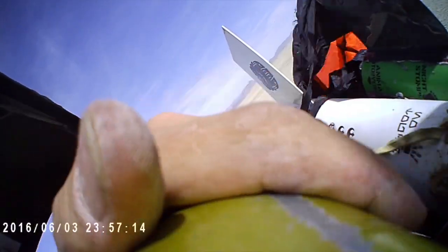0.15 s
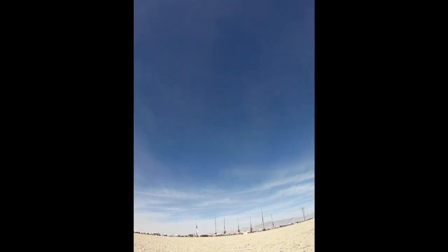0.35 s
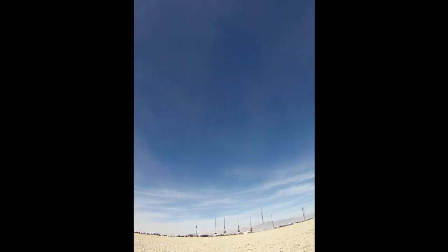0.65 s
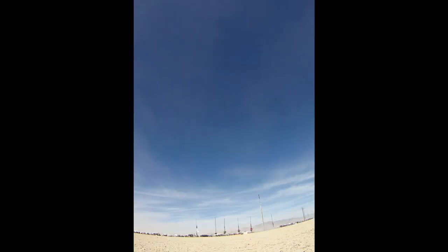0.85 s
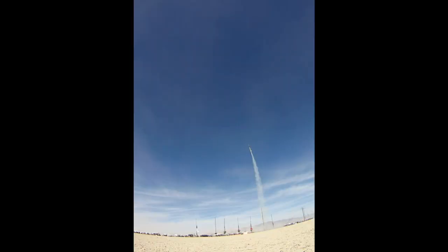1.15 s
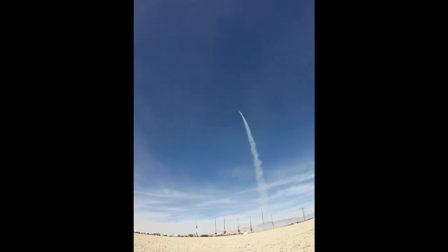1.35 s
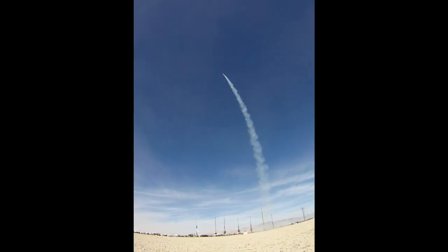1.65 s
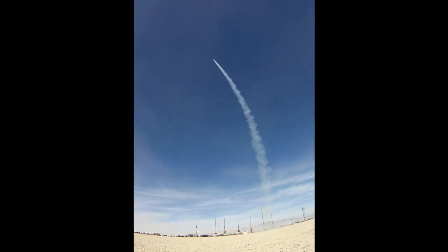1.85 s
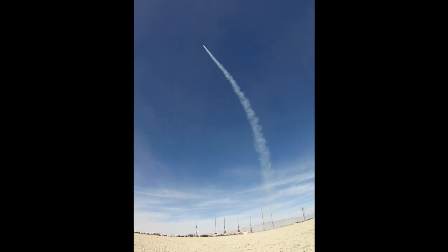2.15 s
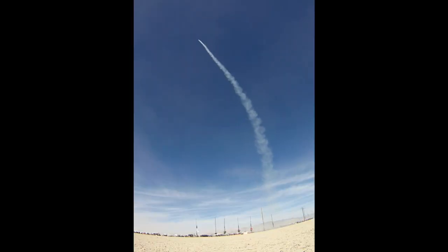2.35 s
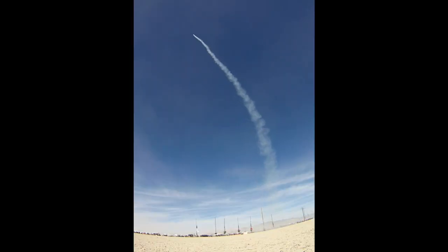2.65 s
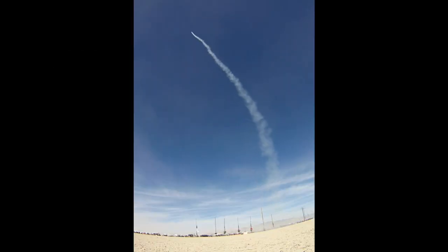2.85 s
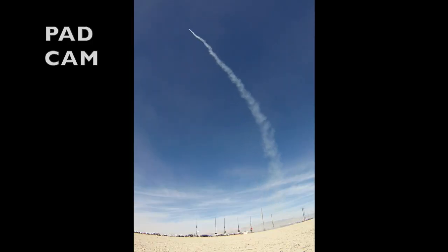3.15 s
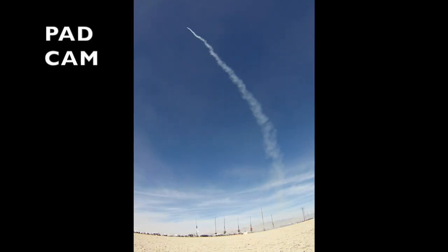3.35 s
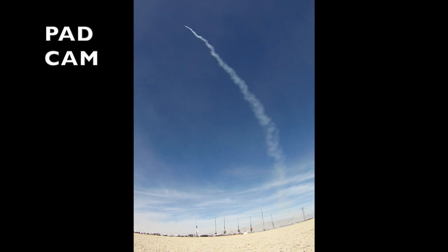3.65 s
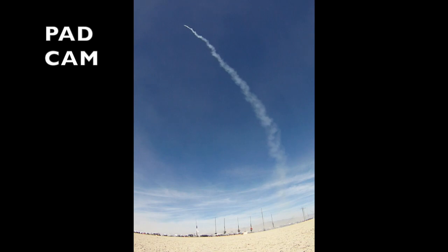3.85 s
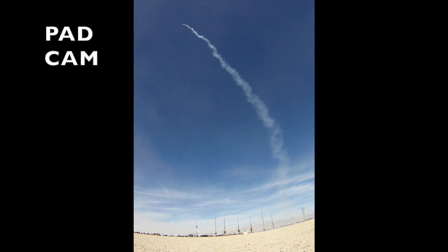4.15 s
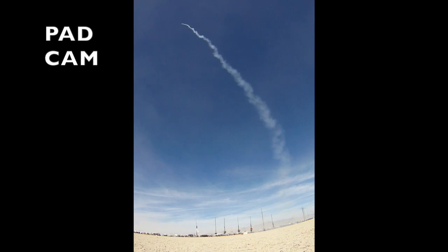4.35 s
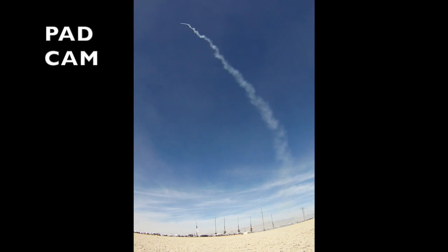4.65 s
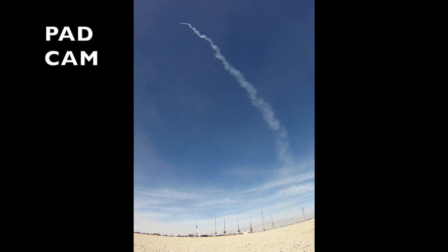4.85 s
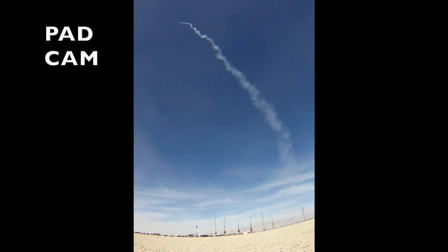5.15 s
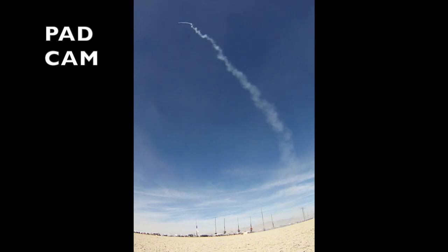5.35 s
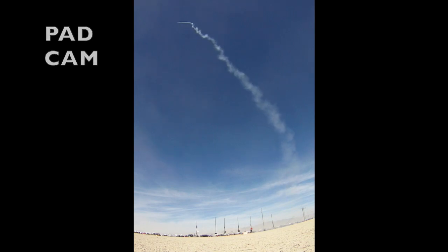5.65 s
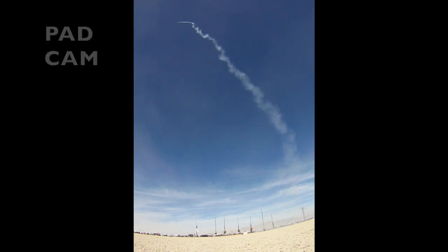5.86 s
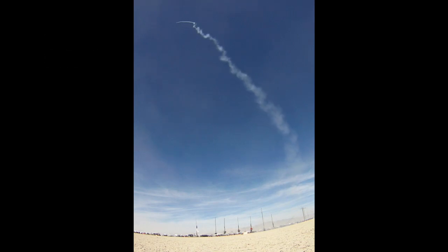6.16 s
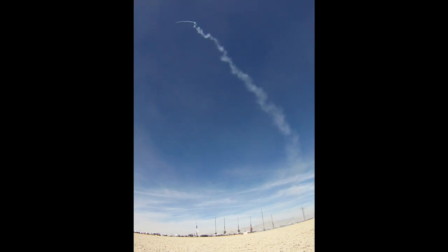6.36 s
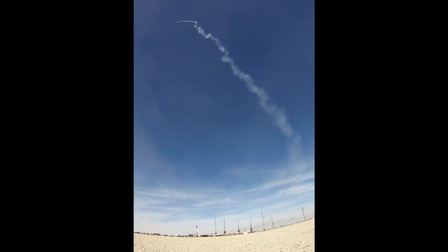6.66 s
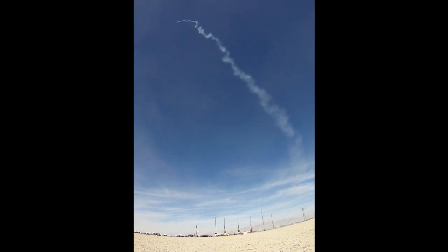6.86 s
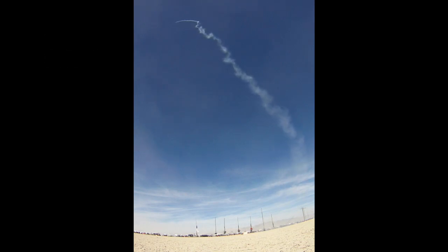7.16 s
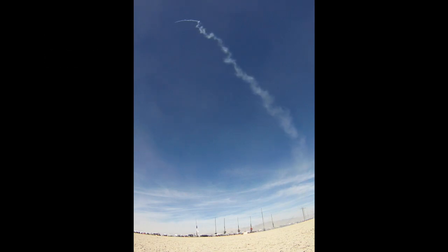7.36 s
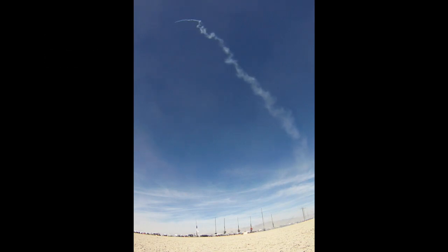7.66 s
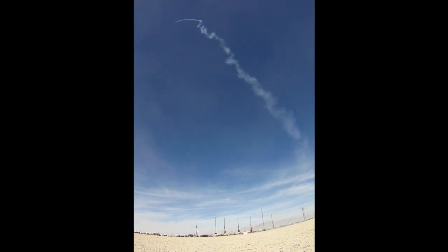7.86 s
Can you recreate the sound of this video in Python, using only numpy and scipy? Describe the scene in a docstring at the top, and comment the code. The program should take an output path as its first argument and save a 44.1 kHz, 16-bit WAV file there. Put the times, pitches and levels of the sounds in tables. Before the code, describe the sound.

Brief rough handling noise, a quiet open-air pause, then a sharp rocket ignition whose hissing rush sinks to a low, rumbling, fading roar.

```python
"""Wind overloads a small camera while a hand bumps it and fabric beside it rubs, scrapes and snaps (shaped noise).
Then the scene cuts to a quiet desert launch pad: faint air noise, a thin whine and faint recorder hiss.
A solid rocket motor spits, thumps and lights with a whoosh, hisses off the rail and climbs away.
Its roar (turbulent noise) sinks in pitch, its ground echo sweeps a notch downwards, the growing depth
of air takes the treble, and gusts make bands of the far roar surge; single shocks pop through it."""
import sys
import numpy as np
from scipy import signal
from scipy.fft import rfft, irfft, next_fast_len
from scipy.io import wavfile
from scipy.ndimage import uniform_filter1d, map_coordinates

SR = 44100
rng = np.random.default_rng(int(sys.argv[2]) if len(sys.argv) > 2 else 0)


def transcribe(signal):
    """Save signal, clipped to [-1, 1], as a 16-bit WAV file at the path in sys.argv[1]."""
    frames = np.atleast_2d(signal).T
    limited = np.clip(frames, -1, 1)
    pcm = np.round(limited * 32767).astype(np.int16)
    wavfile.write(sys.argv[1], SR, pcm)


N = 352800
TIME = np.arange(N) / SR  # s
CUT_S, IGNITION_S = .413, .663

# microphone's weak bass: f/Hz, gain/dB
BASS_CUT = [(20, -38.5), (45, -28.5), (85, -19), (140, -7), (200, -2), (280, -0.5), (400, 0)]
# nozzle hiss spectrum: f/Hz, relative level/dB
HISS_TONE = [(1800, -45), (2500, -10), (3050, -8.5), (3600, -2.5), (4150, -2), (4600, -1), (5400, -3.5),
             (6500, -2.5), (8000, -2), (9500, -4), (11000, -10), (12500, -14.5), (15000, -20)]

# the jet's loudest pitch sinks as its tail turns to the ground
PAD_HZ, ALOFT_HZ, TURN_HALFWAY_S, TURN_SHARPNESS = 1320, 410.7, 0.82, 5.6
# climb up the sky: time from ignition to halfway, sharpness
HALFWAY_S, SWING = .79, 3.2


def amp(db):
    """Decibels to gain."""
    return 10 ** (np.asarray(db) / 20)


def unit(x):
    """x at rms 1."""
    return x / np.sqrt(np.mean(x ** 2) + 1e-20)


def along(points, hz):
    """(f/Hz, value) points read on a log frequency axis."""
    f, v = np.transpose(points)
    return np.interp(np.log(hz + 1e-6), np.log(f), v)


def curves(rows, t=TIME):
    """Each column after the time, read at times t."""
    s, *cols = np.transpose(rows)
    return [np.interp(t, s, c) for c in cols]


def wobble(rate):
    """Smooth random curve, rate knots per second."""
    knots = rng.standard_normal(int(N * rate / SR) + 4)
    return map_coordinates(knots, [TIME * rate])


def filtered(x, response):
    """x times a response of frequency."""
    m = next_fast_len(N + SR // 2)
    hz = np.fft.rfftfreq(m, 1 / SR)
    return irfft(rfft(x, m) * response(hz), m)[:N]


def noise(tone):
    """Coloured noise of rms 1."""
    return unit(filtered(rng.standard_normal(N), lambda hz: amp(along(tone, hz))))


def after(start_s, rise_s):
    """Gate opening linearly from start_s over rise_s."""
    return np.clip((TIME - start_s) / rise_s, 0, 1)


def swell(s, half_s, t=TIME):
    """Gaussian bump of height 1 at s."""
    return np.exp(-np.minimum(((t - s) / half_s) ** 2, 50))


def burst(s, db, t60_s):
    """Gain of a 1 ms rise to s and an exponential decay."""
    return amp(db - 60 * np.clip((TIME - s) / t60_s, 0, 3)) * after(s - .001, .001)


def handling(wind_db=-18, ceiling_db=-20.5):
    """Wind and hand bumps saturate softly at the microphone's ceiling; fabric rubs, scrapes and snaps."""
    # noise spectra: f/Hz, relative level/dB
    wind_tone = [(10, -7.5), (25, 0), (50, -5), (100, -12.5), (200, -18), (400, -31), (800, -44),
                 (2000, -87)]
    bump_tone = [(60, -8), (200, 5), (450, 2), (900, -25), (2000, -52.5), (4000, -100)]
    cloth_tone = [(300, -7), (800, 2.5), (1500, 6.5), (2200, -6), (2900, -12.5), (3700, -9), (4300, -22),
                  (5100, -16), (6200, -29), (9000, -35), (15000, -45)]
    # snap spectrum: f/pitch, relative level/dB
    snap_tone = [(.1, 2), (.35, 2), (.6, -14), (1, 0), (1.3, -22), (2.5, -35)]
    # fabric snaps: t/s, level/dB, pitch/Hz, t60/s
    snap_rows = [(0.156, -38.5, 3900, .06), (.156, -47.5, 7500, .03), (.195, -44, 5200, .03),
                 (.222, -37, 5300, .015), (.342, -41, 7400, .02), (.352, -34, 5140, 0.037)]
    # hand bumps: t/s, level before saturation/dB
    bump_rows = [(0.028, -18), (0.231, -12), (.279, -20.5), (.327, -25.5)]
    # overloads that choke the fabric sounds: start/s, end/s, loss/dB
    overloads = [(.125, 0.132, 14), (0.135, 0.151, 11), (0.169, 0.175, 26), (.179, 0.181, 24),
                 (0.188, .194, 28), (0.203, 0.211, 31), (0.289, 0.293, 15), (0.31, 0.315, 15),
                 (0.347, .351, 17)]
    # firmer rubs: t/s, half length/s, boost/dB
    firm_rubs = [(.225, 0.022, 1.8), (.36, 0.043, 4.5), (.402, .008, 4)]
    cloth_db, bump_t60_s = -42.5, .07

    bumps = sum(burst(s, db, bump_t60_s) for s, db in bump_rows) * noise(bump_tone)
    drive = (amp(wind_db) * noise(wind_tone) + bumps) / amp(ceiling_db)
    saturated = amp(ceiling_db) * drive / (1 + drive ** 4) ** (1 / 4)

    catching_db = 1.8 * wobble(70) + 2 * wobble(400)
    firm_db = sum(db * swell(s, half_s) for s, half_s, db in firm_rubs)
    rub = amp(cloth_db + firm_db + catching_db) * noise(cloth_tone)
    snaps = sum(burst(s, db, t60_s) * noise(np.multiply(snap_tone, [hz, 1]))
                for s, db, hz, t60_s in snap_rows)
    choke_db = sum(db * (after(start, .001) - after(end, .001)) for start, end, db in overloads)
    fabric = (rub + snaps + scrapes()) * amp(-choke_db)
    return (saturated + fabric) * (1 - after(CUT_S - .003, .004))


def scrapes():
    """Short strokes of friction noise excite the stiff fabric's resonances."""
    # t/s, half length/s, level/dB
    strokes = [(0.333, .004, -38), (0.345, 0.0033, -35), (0.364, 0.0069, -37), (.384, 0.011, -44)]
    # resonances: f/Hz, width/Hz, gain/dB
    resonances = [(1266, 230, 1.5), (1746, 220, -1), (2500, 250, -11), (3770, 300, -12.5), (5000, 400, -16)]

    def response(f):
        total = 0
        for k, (hz, width_hz, db) in enumerate(resonances):
            damping = 1j * f * width_hz
            total = total + (-1) ** k * amp(db) * damping / (hz * hz - f * f + damping)
        return total

    friction = unit(filtered(rng.standard_normal(N), response))
    return friction * sum(amp(db) * swell(s, half_s) for s, half_s, db in strokes)


def background(whine_hz=3219):
    """Still desert air (noise), a thin electronic whine (wavering sine) and faint recorder hiss."""
    # noise spectra: f/Hz, relative level/dB
    pad_tone = [(24, -32.5), (40, -17.5), (110, -11), (230, -5), (510, -12), (870, -4), (1500, -7),
                (2400, -17), (4000, -19), (15000, -25)]
    floor_tone = [(500, 10), (3000, 3), (5000, 0.5), (8000, -1.5), (15000, -3.5)]
    # level of the faint hiss, which dips around 2-3 s and later rises: t/s, level/dB
    floor_level = [(.5, -68.5), (2.0, -74.5), (2.8, -74), (3.5, -67), (4.2, -67), (4.6, -61), (8, -61)]

    lull_db = np.interp(TIME, [.43, .55, .62], [-57, -59.5, -54])
    air = amp(lull_db + wobble(14)) * noise(pad_tone) * (1 - after(.8, .15))
    phase = 2 * np.pi * whine_hz * TIME + .2 * wobble(30)
    whine = amp(-66 + wobble(12)) * np.sin(phase) * (1 - after(2.5, 2.5))
    hiss = amp(curves(floor_level)[0] + .7 * wobble(120)) * noise(floor_tone)
    return (air + whine + hiss) * after(CUT_S, 0.00097)


def ignition(flare_db=-28, flare_t60_s=0.56):
    """The igniter spits; first gas flares at the nozzle and strikes the pad: thump and low whoosh."""
    # noise spectra: f/Hz, relative level/dB
    blast_tone = [(20, -37), (60, -18), (170, 1.5), (300, 3), (450, 4), (620, -3), (850, 0.5),
                  (1250, -16.5), (1600, -9.5), (2200, -41), (3500, -71.5)]
    flare_tone = [(1500, -38.5), (2600, -8), (3600, 1), (5000, -2.5), (6600, -8.5), (8200, -3), (10600, 0),
                  (12500, -11.5), (15000, -17)]
    whoosh_db, whoosh_t60_s = -16.5, 1.01
    # the low whoosh stops abruptly, perhaps a wind filter in the camera
    whoosh_end_s, whoosh_end_over_s = 0.875, .07
    thump_db, thump_hz, thump_t60_s = -17, 95, .035

    age_s = np.maximum(TIME - IGNITION_S, 0)
    spit = amp(-38) * after(.647, .016) * (1 - after(IGNITION_S, .02)) * noise(HISS_TONE)
    whoosh = amp(whoosh_db - 60 * age_s / whoosh_t60_s) * noise(blast_tone)
    whoosh *= 1 - after(whoosh_end_s, whoosh_end_over_s)
    flare = amp(flare_db - 60 * age_s / flare_t60_s) * noise(flare_tone)
    thump = burst(IGNITION_S, thump_db, thump_t60_s) * np.sin(2 * np.pi * thump_hz * age_s)
    return (whoosh + flare) * after(IGNITION_S, .007) + spit + thump


def exhaust():
    """Large eddies roar, smaller ones rasp, the finest hiss at the nozzle."""
    # jet spectrum aloft: f/loudest pitch, relative level/dB
    jet = [(.04, -21.5), (.12, -22.5), (.26, -13.5), (.4, -9.5), (.55, -5.5), (.72, -1), (1, 0),
           (1.25, -1.5), (1.6, -2.5), (2.3, -11), (3.5, -31.5), (6, -58.5), (12, -80.5)]
    # abrupt upper end of the roar: f/Hz, gain/dB
    roar_top = [(1350, 2), (1750, -2), (2300, -2.5), (3500, -12)]
    # rasp spectrum: f/Hz, relative level/dB
    rasp_tone = [(500, -50), (850, -9), (1150, 0), (1450, -2), (1800, -2.5), (2100, -7), (2500, -12),
                 (3000, -22), (4000, -49), (6000, -94.5)]
    # swells and ebbs: t/s, half length/s, roar/dB, rasp/dB, hiss/dB
    level_swells = [(0.967, 0.032, -2.5, -6, -2.5), (1.206, 0.063, 4, -3, 1.5),
                    (1.368, 0.13, 5.5, -2.5, 2.5), (1.67, 0.19, 2, 1.5, 1.5), (2.157, 0.19, -0.5, 1.5, 3.5),
                    (2.892, 0.051, -0.5, -1, -9), (3.47, 0.1, 0.5, -2.5, -4.5), (4.083, 0.19, 1, 4.5, -3),
                    (4.12, .05, 0, 1, 4), (4.38, .06, -1.5, -0.5, 3.5), (4.564, 0.29, 0, 6, 3),
                    (5.286, 0.11, 0.5, 2, 0), (5.985, 0.22, 1, -0.5, 0), (7.38, 0.1, 0.5, -1, 0),
                    (7.95, 0.31, 0, 5.5, 0)]
    pad_tightness = 0.11  # extra flank steepness of the jet band at PAD_HZ, share
    roar_dull_hz, hiss_dull_hz = 580, 3800  # air loss starts here
    hiss_end_s = 4.48

    def roar_colour_db(hz, peak_hz, air):
        tightness = 1 + pad_tightness * (peak_hz - ALOFT_HZ) / (PAD_HZ - ALOFT_HZ)
        loss_db = air * np.maximum(hz - roar_dull_hz, 0)
        return tightness * along(jet, hz / peak_hz) + along(roar_top, hz) - loss_db

    def rasp_colour_db(hz, peak_hz, air):
        return along(rasp_tone, hz) - air * hz

    def hiss_colour_db(hz, peak_hz, air):
        return along(HISS_TONE, hz) - air * np.maximum(hz - hiss_dull_hz, 0)

    large = eddies(shock_rate=160, shock_db=-11)
    small = eddies(shock_rate=260, shock_db=-6.5)
    fine = eddies(shock_rate=520, shock_db=-8.5)
    roar = from_sky(large, roar_colour_db, echo=.88, patchy_db=3)
    rasp = from_sky(small, rasp_colour_db, echo=.92, patchy_db=4)
    hiss = from_sky(fine, hiss_colour_db, echo=.6, patchy_db=5)

    roar_swell_db, rasp_swell_db, hiss_swell_db = sum(
        np.outer(dbs, swell(s, half_s)) for s, half_s, *dbs in level_swells)
    roar_db = plume_level(aloft_db=-19.5, pad_db=3, hold_s=4.1, fade_db_per_s=2.5)
    rasp_db = plume_level(aloft_db=-26.5, pad_db=6.5, hold_s=2.04, fade_db_per_s=4.5)
    hiss_flutter_db = 0.88 * rising(HALFWAY_S, SWING) * wobble(11)
    roar *= amp(roar_db + roar_swell_db + 0.18 * wobble(2.3))
    rasp *= amp(rasp_db + rasp_swell_db + 0.51 * wobble(12))
    hiss *= amp(nozzle_level() + hiss_swell_db + hiss_flutter_db) * (1 - after(hiss_end_s, .1))
    sputter = amp(0.75 * wobble(35))  # the grain burns unevenly
    return (roar + rasp + hiss) * sputter * after(IGNITION_S, 0.0051)


def eddies(shock_rate, shock_db):
    """White turbulence plus small shocks of random size, shock_rate per second."""
    clicks = (rng.random(N) < shock_rate / SR) * rng.rayleigh(size=N)
    return unit(rng.standard_normal(N) + amp(shock_db) * unit(clicks - clicks.mean()))


def from_sky(source, colour_db, echo, patchy_db):
    """Moving colour, ground-echo comb, air shimmer and band swells applied to a white source by STFT."""
    # ground echo: t/s, lag/ms, share of full echo
    ground_echo = [(.7, .08, .2), (1.0, .12, .15), (1.17, .185, .3), (1.26, .238, .75), (1.4, .316, .95),
                   (1.48, .36, 1), (1.56, .388, .95), (1.75, .44, .68), (2.0, .472, .48), (3.0, .535, .38),
                   (4.2, .59, .42), (7.0, .635, .6)]
    # narrow band coloured by the camera body, mostly dulled: t/s, f/Hz, loss/dB (negative lifts)
    body_rows = [(1.0, 4430, 5), (1.12, 4330, 11), (1.25, 3930, 15), (1.4, 4320, 3), (1.65, 4170, -8),
                 (1.9, 4450, 17), (2.3, 4540, 16.5), (3.0, 4700, 7)]
    # bands of the exhaust sound that swell or ebb: t/s, half length/s, f/Hz, gain/dB
    exhaust_bands = [(.74, .08, 2100, -6.5), (.96, .05, 8500, 6), (.97, .1, 13000, 1), (1.14, 0.1, 2900, 8),
                     (1.2, .06, 1300, 2.5), (1.33, 0.064, 1930, 2), (1.36, 0.065, 1150, 2.5),
                     (1.37, .06, 7000, 2), (1.41, 0.22, 2160, 6), (1.5, .15, 2920, -6),
                     (1.7, 0.16, 4700, -1.5), (1.95, 0.21, 1960, 2), (2.1, 0.23, 6300, -1),
                     (4.12, .05, 3800, 2), (4.38, .06, 3800, 3)]
    # bands focused or scattered by gusts; the deep dip near 800 Hz around 7 s deepens the ground echo's notch:
    # t/s, half length/s, f/Hz, gain/dB
    gusts = [(4.98, 0.1, 970, 4.5), (4.88, 0.071, 2110, -5), (5.12, 0.04, 1690, 6), (5.26, 0.13, 1390, -5),
             (5.44, .06, 1690, 5), (5.7, 0.17, 1510, -8), (5.85, 0.45, 1120, 4.5), (6.04, 0.11, 1530, 3.5),
             (6.3, .12, 1330, -4.5), (6.38, 0.087, 970, 5), (6.42, .06, 2200, 6), (6.58, 0.082, 1220, -11),
             (6.64, 0.067, 1620, 7.5), (6.72, 0.087, 2050, -6), (6.92, .06, 1930, 4),
             (6.95, 0.37, 797, -13), (7.08, 0.071, 1700, 5.5), (7.17, 0.2, 1200, -11),
             (7.45, 0.19, 1900, -11), (7.62, 0.3, 1030, -1.5)]
    body_width_hz, sand_hz = 300, 13000  # rough sand mirrors less well towards sand_hz and above
    air_db_per_khz, air_halfway_s, air_sharpness = 16.5, 3.45, 1.67
    far_s, far_hz_per_s = 5.7, 29  # pitch creeps up again far away

    hz, t, z = signal.stft(source, SR, nperseg=1024, noverlap=768)
    hz = hz[:, None]
    turn = np.interp(t, TIME, rising(TURN_HALFWAY_S, TURN_SHARPNESS))
    peak_hz = PAD_HZ + (ALOFT_HZ - PAD_HZ) * turn + far_hz_per_s * np.maximum(t - far_s, 0)
    depth = np.interp(t, TIME, rising(air_halfway_s, air_sharpness))
    air_db_per_hz = air_db_per_khz * depth / 1000

    lag_ms, share = curves(ground_echo, t)
    reflection = echo * share / (1 + (hz / sand_hz) ** 2)
    # sand shifts the phase by .06 cycle
    mirror = reflection * np.exp(-2j * np.pi * (hz * lag_ms / 1000 - .06))

    # uneven air scatters short waves most, more so over a long path
    field = rng.standard_normal(z.shape)
    for _ in range(2):
        field = uniform_filter1d(field, size=5, axis=0)
        field = uniform_filter1d(field, size=30, axis=1)
    shimmer_db = patchy_db * unit(field) * np.sqrt(t / t[-1]) * hz / (hz + 1200)

    body_hz, loss_db = curves(body_rows, t)
    body_loss_db = loss_db * np.exp(-((hz - body_hz) / body_width_hz) ** 2)
    tone_db = colour_db(hz, peak_hz, air_db_per_hz) + shimmer_db - body_loss_db + along(BASS_CUT, hz)
    gain = abs(1 + mirror) * amp(tone_db)
    gain /= np.sqrt(np.mean(gain ** 2, axis=0))  # level per frame is set later
    gain *= amp(band_swells(exhaust_bands, 0.32, hz, t) + band_swells(gusts, 0.21, hz, t))
    return signal.istft(z * gain, SR, nperseg=1024, noverlap=768)[1][:N]


def rising(halfway_s, sharpness):
    """0 at ignition towards 1 far aloft, as an accelerating rocket climbs the sky."""
    height = (np.maximum(TIME - IGNITION_S, 0) / halfway_s) ** sharpness
    return height / (1 + height)


def band_swells(rows, octaves, hz, t):
    """Gain in dB of swells that each lift or lower one band for a while."""
    total_db = 0
    for s, half_s, centre_hz, db in rows:
        band = np.exp(-(np.log2((hz + 1) / centre_hz) / octaves) ** 2)
        total_db = total_db + db * swell(s, half_s, t) * band
    return total_db


def plume_level(aloft_db, pad_db, hold_s, fade_db_per_s):
    """Level in dB: pad_db weaker on the pad, holds aloft, then fades into the distance."""
    on_pad = 1 - rising(HALFWAY_S, SWING)
    return aloft_db - pad_db * on_pad - fade_db_per_s * np.maximum(TIME - IGNITION_S - hold_s, 0)


def nozzle_level():
    """Level in dB: builds with chamber pressure, then drops with every doubling of distance."""
    full_db, start_loss_db, build_at_s, build_s = -21.5, 13.5, 0.772, 0.13
    off_rail_s, climb_s = 0.84, 0.35  # climb_s: time to climb as far as the pad is away
    db_per_doubling = 14
    distance = np.hypot(1, np.maximum(TIME - off_rail_s, 0) / climb_s)
    build_db = start_loss_db * (1 - after(build_at_s, build_s))
    return full_db - build_db - db_per_doubling * np.log2(distance)


def shocks():
    """Strong plume shocks, rounded by the air into dull pops: Gaussian-windowed cosines."""
    # t/s, peak before bass cut/dB, f/Hz
    pops = [(.736, -15.5, 704), (3.074, -4, 368.5), (4.664, -5.5, 448), (5.185, -15, 473), (5.302, -9, 480),
            (5.8, -11, 490), (5.946, -10, 490), (6.305, -15.5, 523), (6.938, -6, 332), (7.356, -15, 444),
            (7.868, -11.5, 473)]
    out = np.zeros(N)
    for s, db, centre_hz in pops:
        cycles = (TIME - s) * centre_hz
        out -= amp(db) * np.cos(2 * np.pi * cycles) * np.exp(-(cycles / .72) ** 2)
    return filtered(out, lambda hz: amp(along(BASS_CUT, hz)))


def scene():
    """All sources at one microphone."""
    return (handling() + background() + ignition() + exhaust() + shocks())[None]


def record(dry):
    """The camera keeps nothing above its band limit."""
    top_hz = 15280
    return np.array([filtered(channel, lambda hz: hz < top_hz) for channel in dry])


dry = scene()
out = record(dry)
transcribe(out)
```